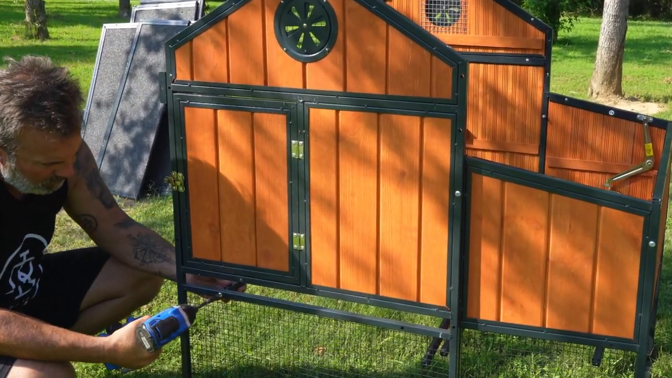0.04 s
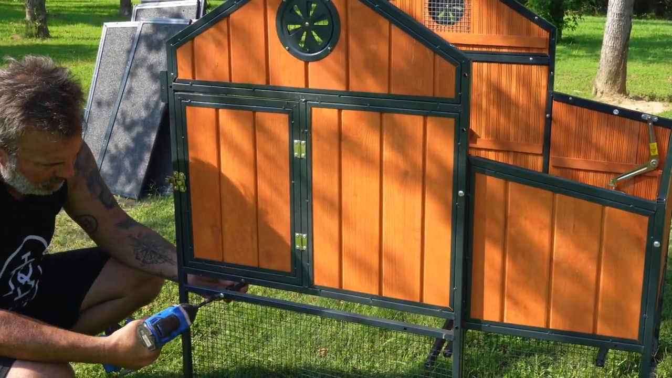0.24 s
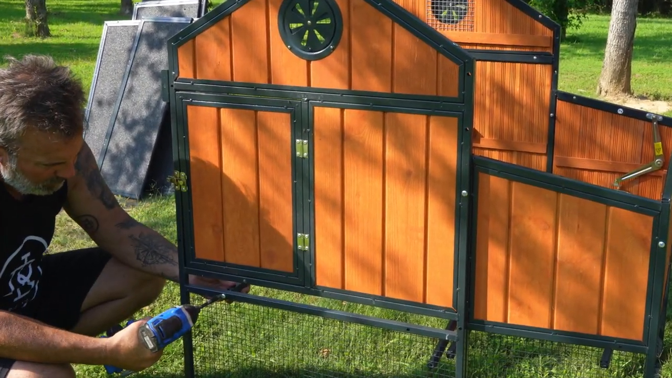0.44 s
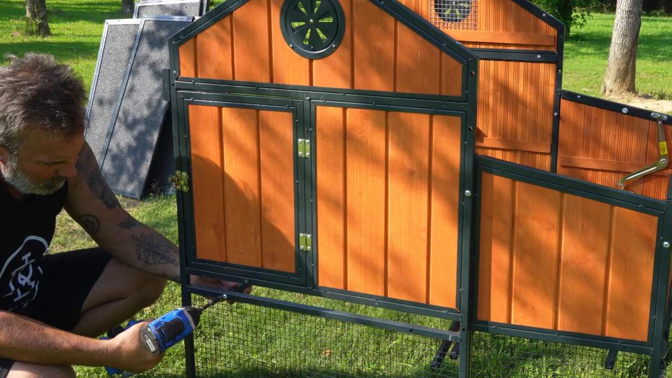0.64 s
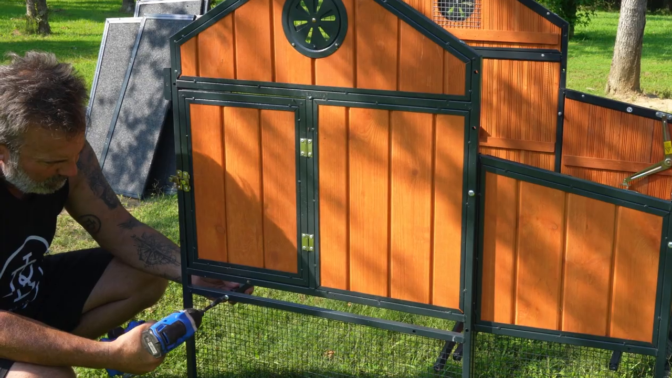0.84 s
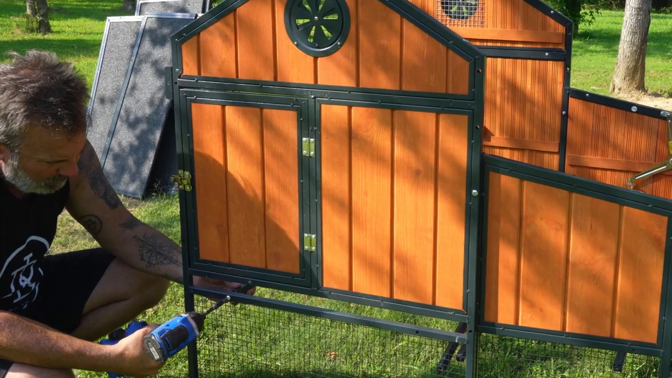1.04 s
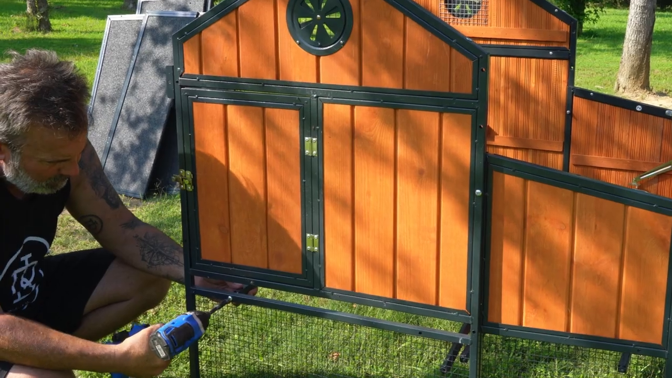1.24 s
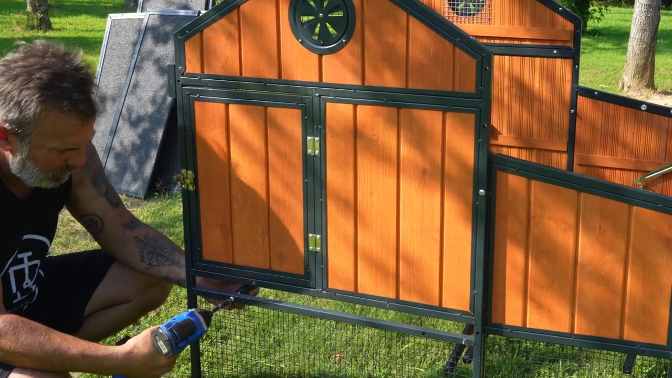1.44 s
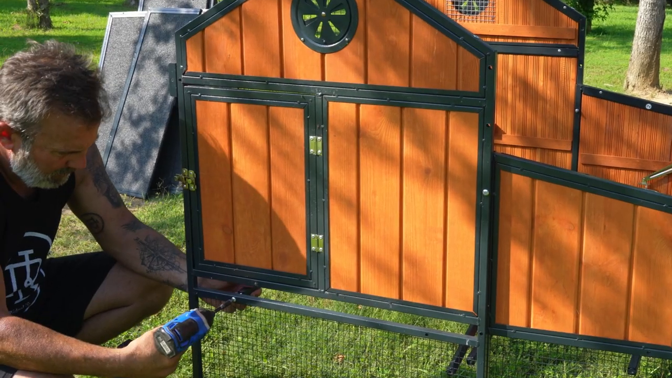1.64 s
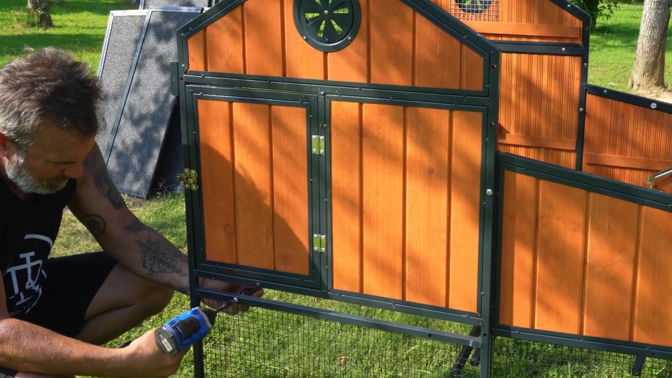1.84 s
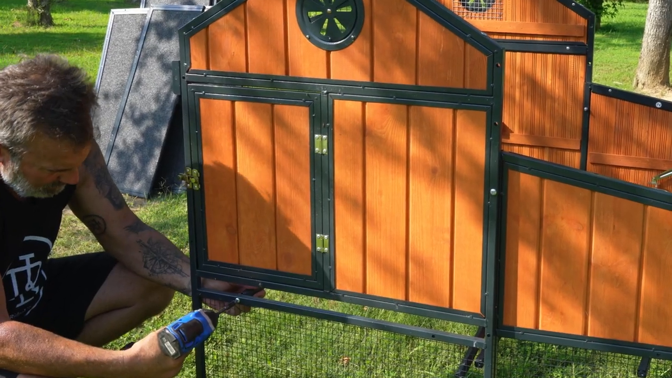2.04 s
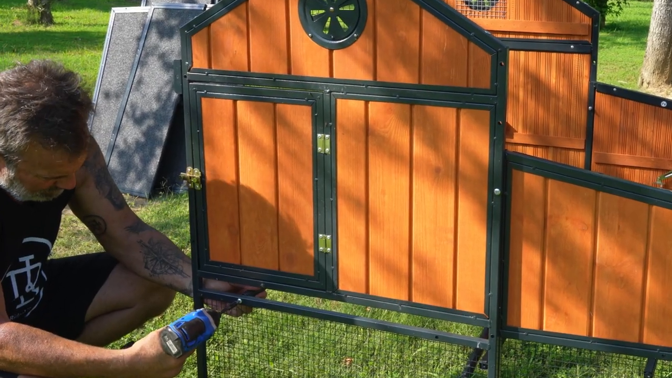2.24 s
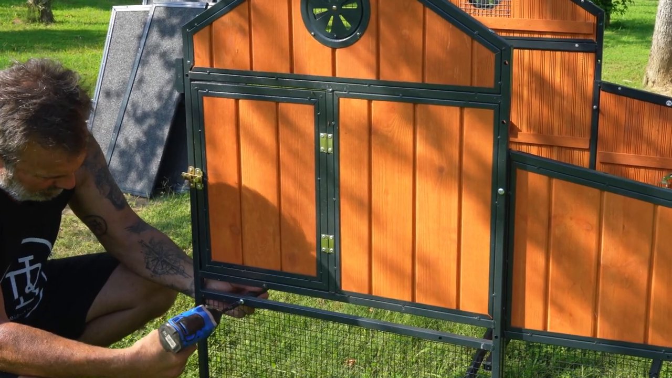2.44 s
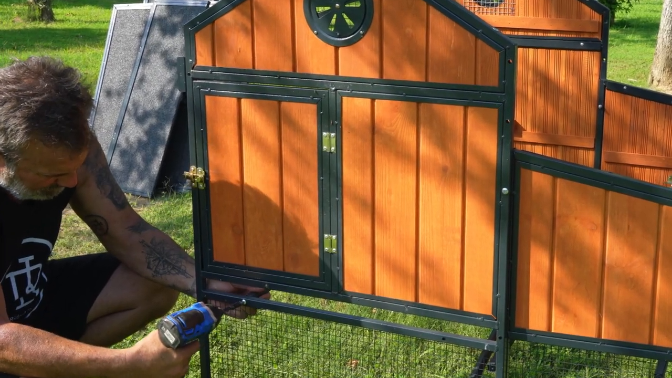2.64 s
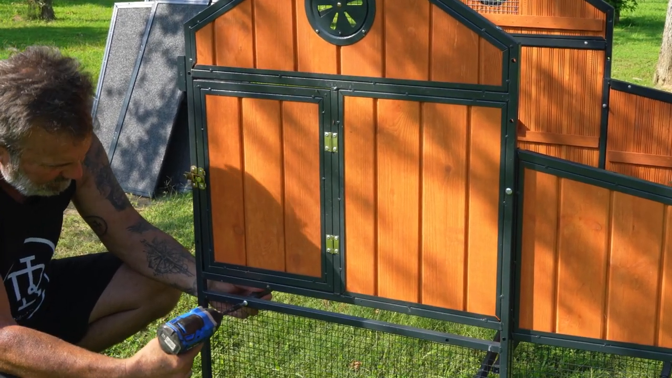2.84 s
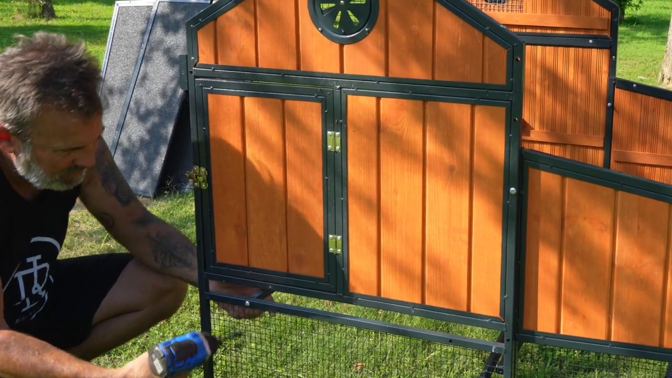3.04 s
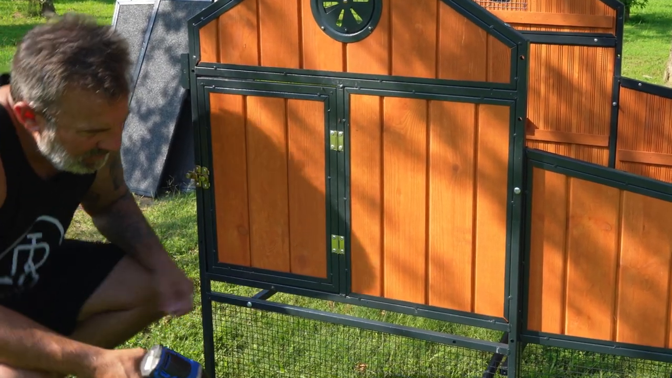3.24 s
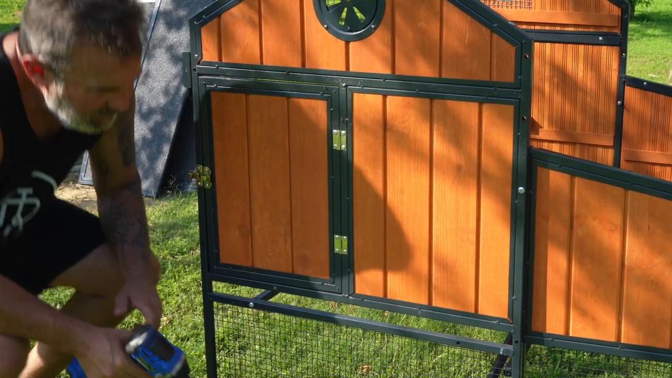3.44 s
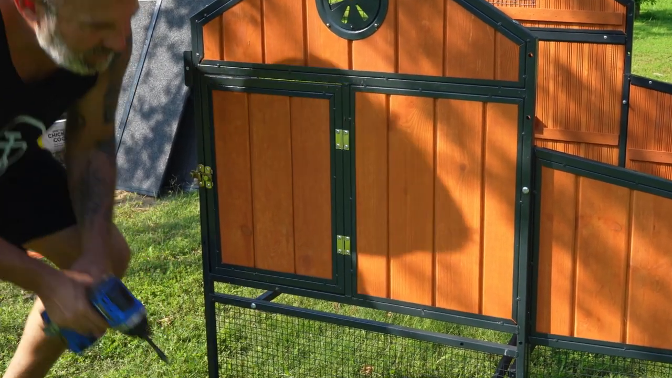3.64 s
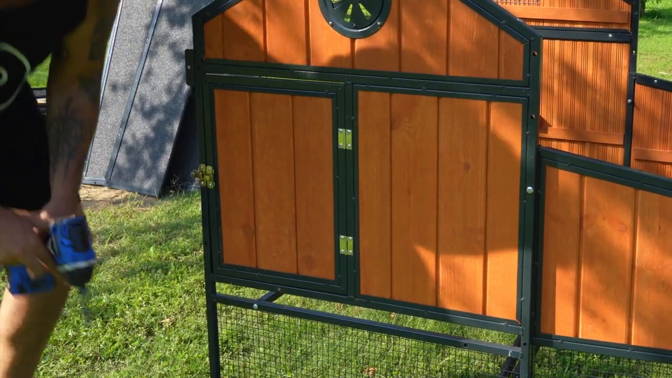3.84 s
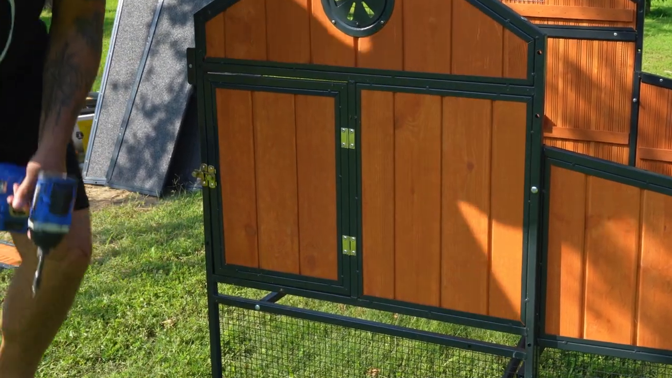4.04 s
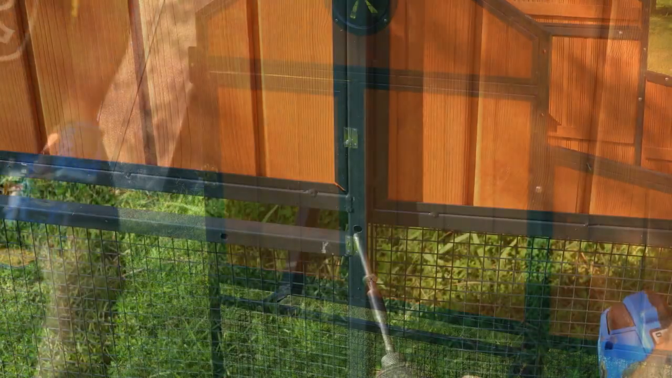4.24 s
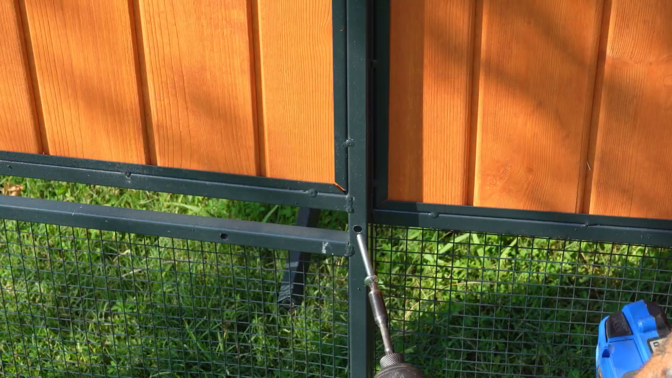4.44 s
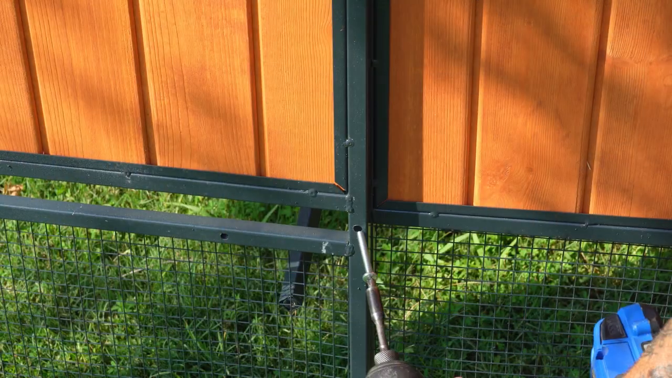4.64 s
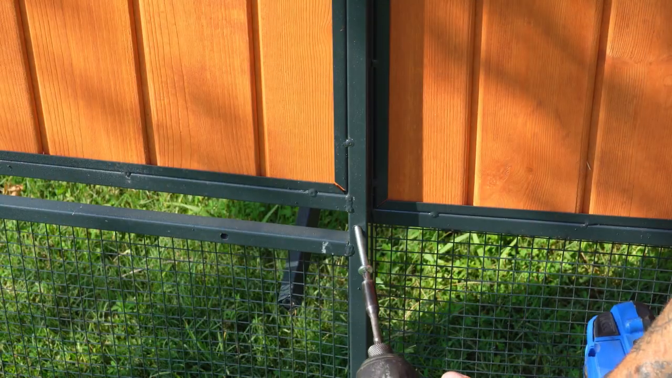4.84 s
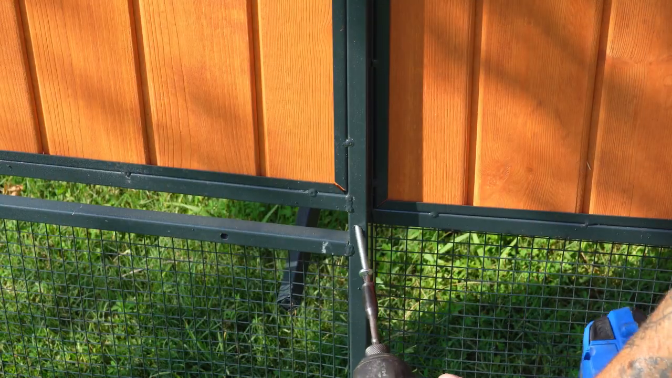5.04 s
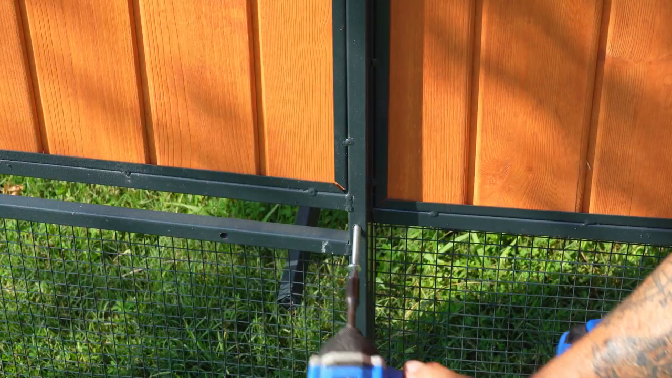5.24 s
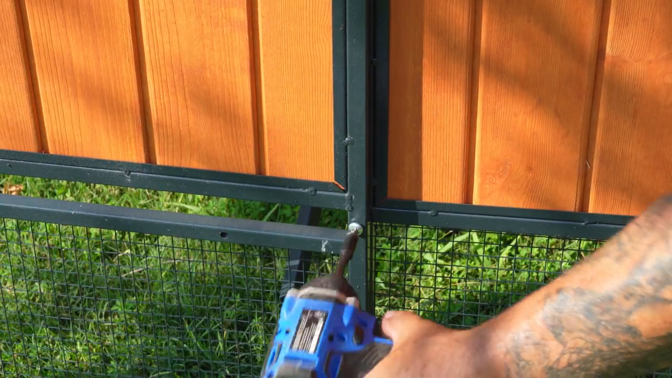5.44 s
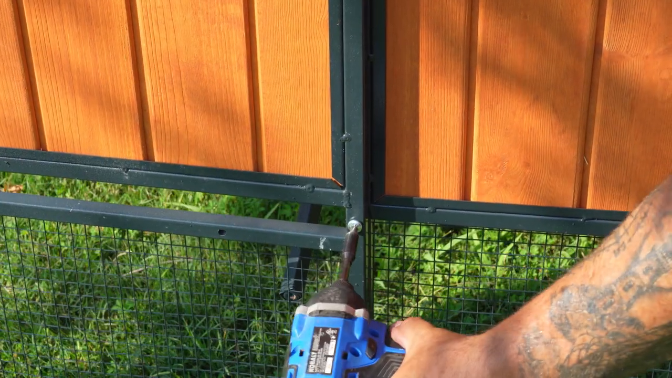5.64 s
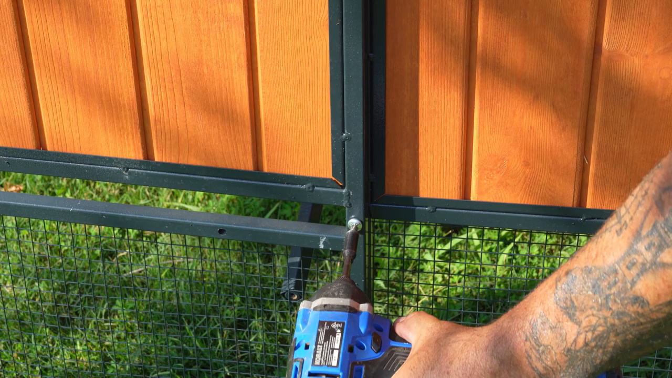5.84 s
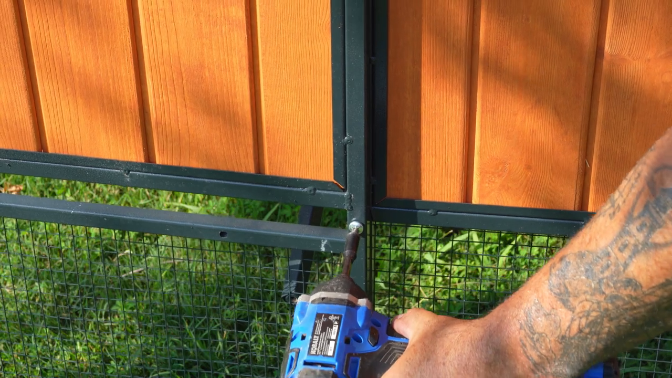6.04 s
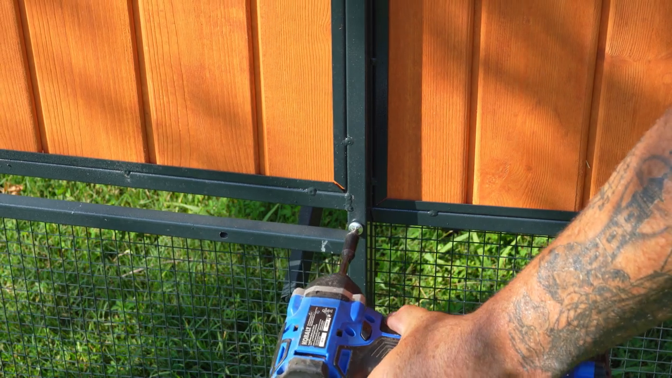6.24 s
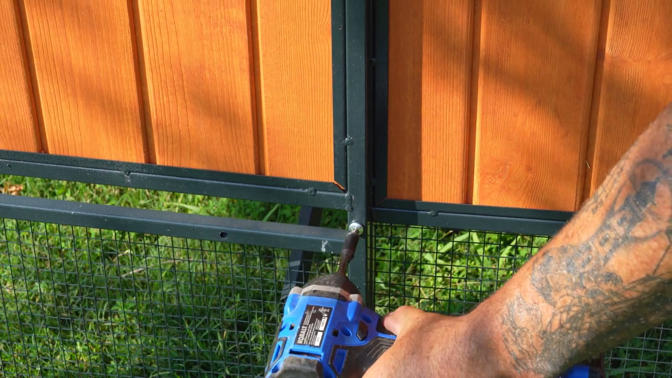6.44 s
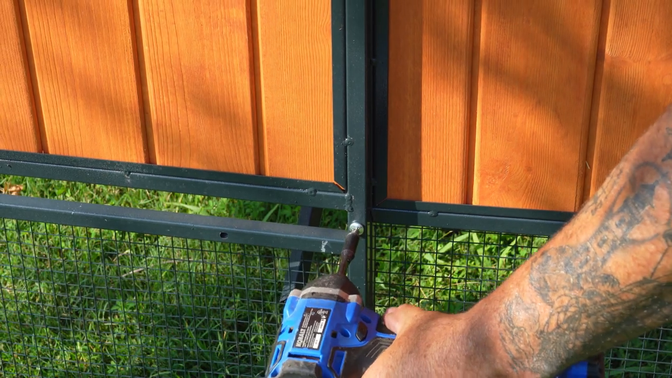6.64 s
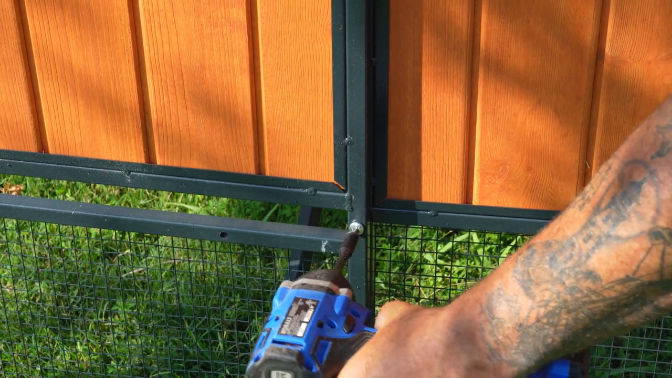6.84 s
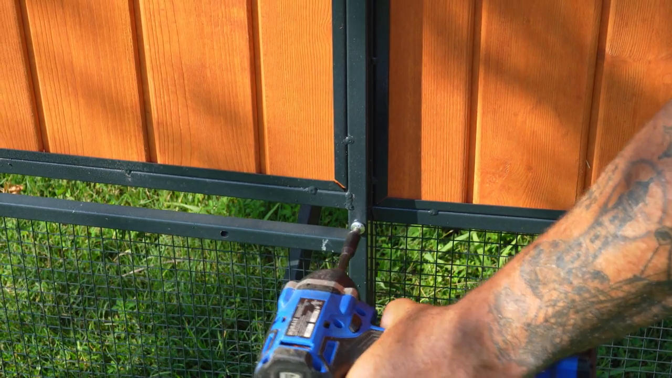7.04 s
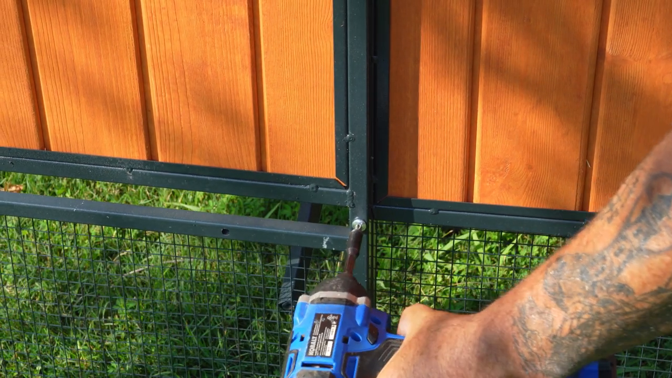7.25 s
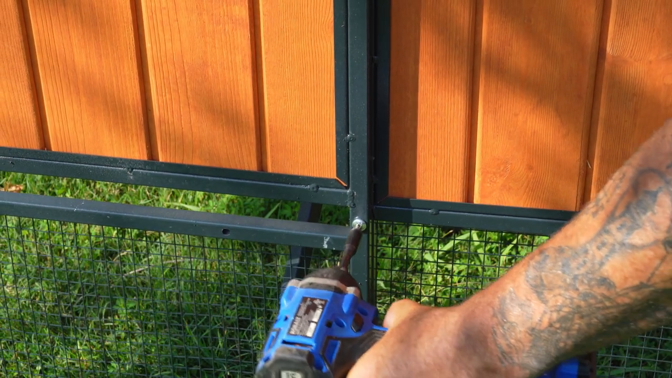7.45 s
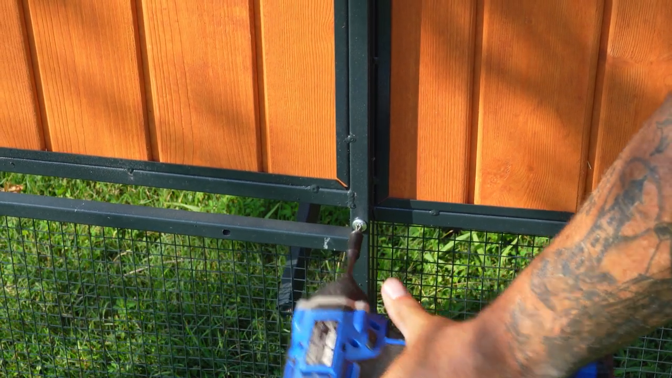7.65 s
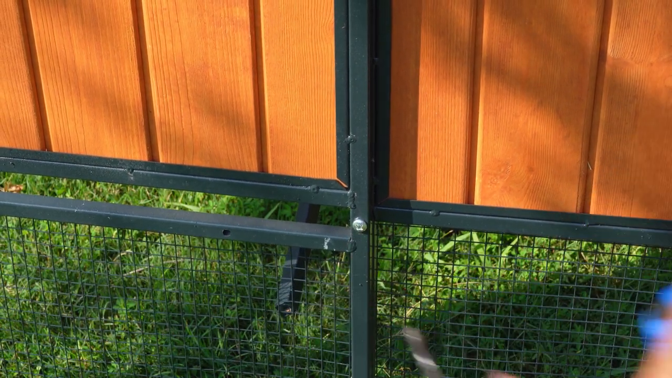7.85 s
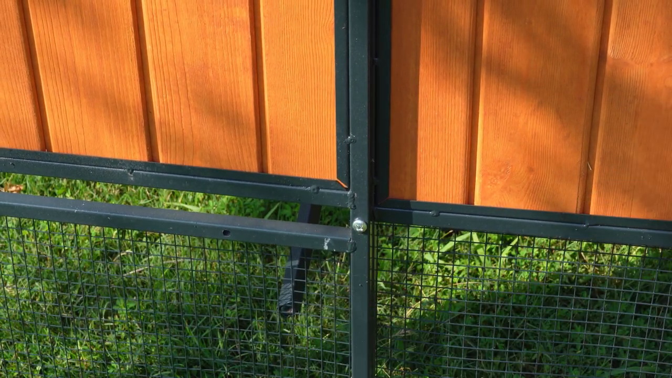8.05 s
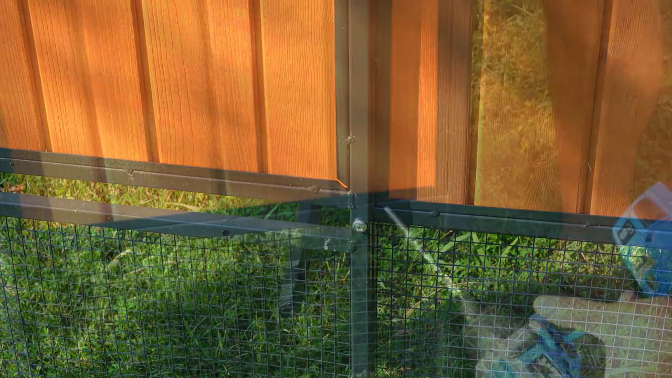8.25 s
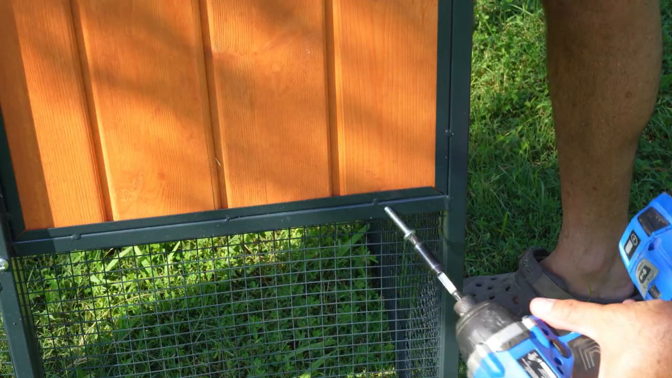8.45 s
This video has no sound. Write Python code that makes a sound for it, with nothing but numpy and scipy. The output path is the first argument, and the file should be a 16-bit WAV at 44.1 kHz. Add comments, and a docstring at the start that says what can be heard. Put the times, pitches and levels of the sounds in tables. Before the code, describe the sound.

A cordless impact driver whines and hammers bolts into a steel frame in short bursts, with clicks and knocks between and faint birds outdoors.

```python
"""A cordless impact driver spins two bolts into the steel frame of a wooden hutch on a lawn.
Over outdoor air and far birds, the bit ticks and knocks on frame and panels. From 1.8 s the motor
whines through its housing in three pulls; in the third the bolt is tight, the hammer strikes the
anvil and the bit rattles free. From 4.8 s the bit knocks and scrapes into the second bolt, which
one pull at 6.9 s spins in and hammers tight. A last rattle and a few ticks follow."""
import sys
import numpy as np
from scipy import signal
from scipy.fft import rfft, irfft, next_fast_len
from scipy.io import wavfile
from scipy.ndimage import uniform_filter1d

SR = 44100
rng = np.random.default_rng(int(sys.argv[2]) if len(sys.argv) > 2 else 0)


def transcribe(u):
    """Save the signal u as a 16-bit wav file named by the first command-line argument.

    u: samples, shape (n,) or (channels, n), limited to [-1, 1]; the rate is SR.
    q: integer samples, one column per channel.
    """
    v = np.clip(np.atleast_2d(u).T, -1, 1)
    q = np.round(v * 32767).astype(np.int16)
    wavfile.write(sys.argv[1], SR, q)


N = 375291
TIME_S = np.arange(N) / SR
PLACE = np.clip((TIME_S - 4.3) / .34 + .5, 0, 1)  # 0 at bolt 1, 1 at bolt 2
REFERENCE_HZ = 800
# motor speed, one list per trigger pull: (time [s], first whine order [Hz])
MOTOR_SPEED = [
    [(1.79, 30), (1.85, 470), (1.89, 750), (1.914, 825), (1.966, 718), (1.994, 640), (2.05, 510),
     (2.075, 400)],
    [(2.09, 20), (2.15, 440), (2.196, 750), (2.22, 845), (2.27, 730), (2.324, 600), (2.37, 520)],
    [(2.415, 20), (2.5, 430), (2.54, 600), (2.62, 1150), (2.72, 1200), (2.85, 600)],
    [(6.89, 30), (6.95, 400), (6.98, 645), (7.02, 865), (7.06, 1115), (7.09, 1255), (7.122, 1300),
     (7.145, 1245), (7.18, 1125), (7.3, 1270), (7.6, 1280), (7.68, 750), (7.77, 500)],
]


def undb(db):
    return np.exp(np.asarray(db) * (np.log(10) / 20))


def unit(x):
    return x / np.sqrt(np.mean(x ** 2))


def bolt(first, second):
    """Crossfade from bolt 1 to bolt 2."""
    return first + (second - first) * PLACE


def bolt_gain(first_db, second_db):
    return bolt(undb(first_db), undb(second_db))


def butter(x, hz, kind="low"):
    return signal.sosfilt(signal.butter(2, hz, kind, fs=SR, output="sos"), x)


def colour(x, points):
    """Shape by (frequency [Hz], gain [dB]) points; white noise keeps its level."""
    n = next_fast_len(N)
    hz, db = np.transpose(points)
    bins_hz = np.arange(n // 2 + 1) * SR / n
    gain = undb(np.interp(np.log(bins_hz + 1), np.log(hz), db))
    return irfft(rfft(x, n) * unit(gain), n)[:N]


def ring(x, modes):
    """Resonances (frequency [Hz], width [Hz], gain [dB]); a list x drives each on its own."""
    drives = x if isinstance(x, list) else [x] * len(modes)
    out = sum(undb(db) * signal.lfilter(*signal.iirpeak(hz, hz / width, SR), drive) / np.sqrt(width)
              for drive, (hz, width, db) in zip(drives, modes))
    return out / np.sqrt(np.pi / SR * sum(undb(2 * db) for _, _, db in modes))


def walk(rate_hz):
    """Slewed random steps, RMS 1."""
    hold = int(SR / rate_hz)
    steps = np.repeat(rng.standard_normal(N // hold + 1), hold)
    return unit(uniform_filter1d(steps, hold)[:N])


def jolts(times_s, dbs):
    """One sample of force per contact."""
    force = np.zeros(N)
    force[(np.asarray(times_s) * SR).astype(int)] = undb(dbs)
    return force


def bursts(times_s, dbs, t60s, rise_s=0.00058):
    """Noise with a sharp rise and an exponential fall per contact."""
    power = np.zeros(N)
    for s, db, t60 in np.broadcast(times_s, dbs, np.maximum(t60s, .003)):
        i = int(s * SR)
        t = TIME_S[:min(int(t60 * SR), N - i)]
        power[i:i + len(t)] += undb(2 * (db - 60 * t / t60)) * (1 - np.exp(-t / rise_s))
    return np.sqrt(power) * rng.standard_normal(N)


def swells(rows, rise_db=30):
    """Envelope that climbs to each peak and dies away; powers add."""
    t = TIME_S[::16]
    power = sum(undb(2 * (db - np.where(t < s, rise_db * (s - t) / rise_s, 60 * (t - s) / t60)))
                for s, db, rise_s, t60 in rows)
    return np.interp(TIME_S, t, np.sqrt(power))


def echoes(x, t60_s):
    """Diffuse return: decaying noise as the response."""
    t = np.arange(int(t60_s * SR)) / SR
    tail = undb(-60 * t / t60_s) * rng.standard_normal(len(t))
    return signal.fftconvolve(x, tail / np.sqrt(np.sum(tail ** 2)))[:N]


def air():
    """Leaves and far traffic, swelling slowly."""
    # one spectrum per bolt: (frequency [Hz], density [dB])
    spectra = [
        [(15, -43.5), (35, -6.5), (236, -6), (277, -15), (326, 4), (354, -12.5), (489, -7), (607, -11),
         (1560, -20), (2350, -23), (3620, -26.5), (16000, -54.5)],
        [(15, -41), (35, -11.5), (166, -4.5), (301, -17.5), (335, -3.5), (405, -19.5), (531, -13.5),
         (1020, -13.5), (1840, -25.5), (3820, -31.5), (4140, -34.5), (16000, -58)],
    ]
    # air level: (bolt 1 [dB], bolt 2 [dB])
    levels_db = [-64, -63]
    first, second = (undb(db) * unit(colour(rng.standard_normal(N), spectrum))
                     for spectrum, db in zip(spectra, levels_db))
    return undb(walk(2.1)) * (np.sqrt(1 - PLACE) * first + np.sqrt(PLACE) * second)


def hutch(blows, motor_level, load, spot_db_per_octave=21.5, soft_hz=852):
    """Shoves, knocks, motor rumble and hammer blows drive the panel modes."""
    # shoves on the hutch: (peak time [s], level [dB], rise [s], T60 [s])
    shoves = [(0.005, -49.5, 0.013, 0.17), (1.024, -44.5, 0.063, 0.17), (1.166, -48.5, 0.042, 0.19),
              (1.238, -41, 0.051, 0.28), (1.472, -46, 0.016, 0.76), (2.56, -13.5, 0.023, 0.12),
              (2.75, -18, 0.19, 0.39), (2.89, -43, 0.03, 1.16), (3.3, -57, 0.041, 2.4),
              (4.77, -47.5, 0.014, 1), (4.938, -33, 0.034, 0.25), (5.05, -56, 0.023, 2.2),
              (5.328, -31, 0.004, 0.38), (5.39, -17, 0.044, 0.34), (5.505, -19, 0.1, 0.41),
              (5.67, -50, .02, 1.95), (6.118, -54.5, 0.028, 1.7), (6.49, -13.5, 0.018, 0.067),
              (6.51, -29, .01, 0.57), (7.06, -24, 0.084, 0.7), (7.63, -14.5, 0.015, 0.38),
              (7.82, -44, 0.024, 2.16), (8.29, -53, 0.061, 0.14), (8.37, -39.5, 0.0069, 0.075)]
    # knocks on the panels: (time [s], level [dB], T60 [s], pitch of the struck spot [Hz])
    knocks = [(0.346, -45.5, 0.36, 315), (0.613, -36.5, 0.18, 480), (1.018, -53, 0.089, 433),
              (1.233, -50, 0.073, 330), (1.474, -20, 0.065, 280), (1.567, -49, 0.033, 230),
              (2.547, -11, 0.15, 290), (3.025, -31, 0.14, 325), (3.04, -34.5, 0.044, 640),
              (3.302, -33.5, 0.11, 610), (4.769, -28, 0.069, 250), (4.812, -35, .05, 250),
              (4.903, -20.5, 0.33, 343), (4.93, -19, 0.039, 345), (4.947, -25, .05, 240),
              (4.968, -36, .05, 330), (4.987, -24.5, 0.063, 330), (5.087, -35, 0.12, 347),
              (5.203, -35.5, 0.051, 240), (5.326, -23, 0.12, 310), (5.37, -7.5, 0.062, 330),
              (5.389, -1, 0.059, 385), (5.407, 3.5, 0.021, 730), (5.468, 5.5, 0.05, 805),
              (5.497, -8, 0.097, 265), (5.515, -0.5, 0.032, 227), (5.565, -14, 0.07, 260),
              (5.75, -31.5, 0.12, 250), (5.785, -35.5, 0.056, 250), (5.835, -40, .05, 255),
              (5.869, -35.5, .05, 255), (5.9, -35.5, 0.15, 373), (6.112, -35, 0.044, 338),
              (6.366, -35.5, 0.28, 382), (6.483, -16, 0.042, 340), (6.525, -13, 0.04, 230),
              (6.562, -25, 0.056, 255), (7.159, -4, 0.25, 295), (7.612, -8, 0.069, 804),
              (7.629, -9, 0.044, 500), (7.671, -9.5, 0.029, 414), (7.948, -27, 0.054, 620),
              (8.023, -31, 0.1, 370), (8.368, -29, 0.026, 483)]
    # panel modes: (frequency [Hz], width [Hz], gain at bolt 1 [dB], gain at bolt 2 [dB])
    panels = [(47.9, 69, -11, -1), (176, 62, -5.5, 2.5), (225, 28, -4, -2), (255.4, 15, -0.5, -0.5),
              (300.6, 30, 3.5, 2), (347, 13, 0.5, 1), (376.7, 20, 0, -3), (419.6, 27, 3, -6),
              (482.4, 35, -1.5, 1), (637.3, 84, 1.5, -4.5), (707, 110, -4, -6.5), (808, 33, -6.5, -4),
              (918, 96, -8, -9.5), (1180, 110, -13.5, -18.5)]
    s, db, t60_s, spot_hz = np.transpose(knocks)
    push = np.hypot(swells(shoves), bolt_gain(1, 0) * motor_level)
    push = push * undb(walk(40)) * rng.standard_normal(N)
    push *= undb(-8 * load * PLACE)  # bolt 2 clamps the frame: less rattle under the hammer
    thuds = bursts(s, db, t60_s, rise_s=0.0034)
    common = undb(-8.5) * push + undb(-21) * thuds + undb(0.5) * blows
    drives = []
    for hz, width, db1, db2 in panels:
        off_spot_db = spot_db_per_octave * abs(np.log2(hz / spot_hz))
        hits = jolts(s, db + 11 - off_spot_db) * np.sqrt(30 / width)
        drives.append((common + hits) * bolt_gain(db1, db2))
    wood = undb(5) * ring(drives, [(hz, width, 0) for hz, width, _, _ in panels])
    return butter(wood, soft_hz)  # soft contacts carry little treble


def birds():
    """Far whistles that glide and settle, smeared by echoes among the trees."""
    # calls: (start [s], length [s], first pitch [Hz], last pitch [Hz], level [dB])
    calls = [(0.033, 0.12, 1490, 1790, -85), (0.115, .04, 2110, 2380, -75), (0.18, 0.085, 4800, 3480, -74),
             (0.452, 0.11, 1500, 1780, -78), (0.532, 0.028, 2070, 2370, -68),
             (0.575, 0.1, 5250, 3460, -71.5), (0.863, 0.1, 1480, 1720, -77),
             (0.948, 0.036, 2050, 2400, -68), (1.027, 0.065, 4100, 3530, -70),
             (1.257, .05, 3700, 3820, -73), (1.35, 0.043, 2080, 2430, -70), (1.422, 0.074, 4700, 3900, -76),
             (4.576, .12, 3150, 3870, -78.5)]
    out = np.zeros(N)
    for s, length_s, first_hz, last_hz, db in calls:
        u = np.linspace(0, 1, int(length_s * SR))
        hz = last_hz + (first_hz - last_hz) * (1 - u) ** (2.5 if first_hz > last_hz else 1.2)
        i = int(s * SR)
        out[i:i + len(u)] += undb(db) * np.sin(np.pi * u) * np.sin(2 * np.pi * np.cumsum(hz) / SR)
    return out + undb(3) * echoes(out, t60_s=0.6)


def ticks(clink_t60_s=.12, rasp_t60_s=.075, treble_t60_s=.08, spread_octaves=.35):
    """Bit and trigger touch steel: a two-band rasp and the bit's ring, its modes varying by touch."""
    # touches: (time [s], level [dB], relative treble [dB])
    touches = [(0.0915, -45, -31), (0.3404, -36, -10), (.995, -40, -8), (1.001, -35.5, -7.5),
               (1.012, -35.5, -18), (1.1348, -45.5, -14), (1.1542, -35, -11), (1.207, -42.5, -9),
               (1.2615, -48, -23), (1.298, -51.5, -12), (1.4227, -49.5, -27), (1.47, -37.5, -25),
               (1.701, -51, -25), (1.735, -45, -11), (1.756, -40, -24), (1.7853, -27, -20),
               (1.807, -24.5, -9.5), (1.8574, -25.5, -27), (2.003, -38, -25), (2.073, -34, -15),
               (2.089, -39, -12), (2.3562, -30, -9.5), (2.387, -39, -24), (2.398, -43, -22.5),
               (2.422, -33.5, -22.5), (3.038, -44.5, -14), (3.11, -46, -31), (3.1644, -45.5, -8),
               (3.2632, -62, -36), (3.37, -53, -23), (3.427, -43.5, -6), (3.567, -55, -24),
               (3.683, -45.5, -5), (3.797, -58, -8.5), (3.847, -51, -21.5), (3.87, -50, -17),
               (3.8988, -53, -13), (3.939, -58.5, -14), (4.0992, -54, -3), (4.1983, -64.5, -2),
               (4.785, -53, -24), (4.8748, -46, -28.5), (4.899, -36, -33.5), (4.913, -31, -28),
               (4.9336, -42, -28.5), (4.959, -39, -26), (5.0867, -47, -30), (5.1683, -43.5, -11.5),
               (5.337, -26, -14), (5.361, -14, -5.5), (5.405, -11.5, -30), (5.46, -16.5, 1.5),
               (5.474, -16, -3.5), (5.537, -19, -3), (5.572, -29, -5), (5.657, -37.5, -27),
               (5.686, -39.5, -14), (5.756, -44.5, -8), (6.021, -42, -29), (6.102, -42, -13.5),
               (6.181, -47, -30.5), (6.213, -49.5, -16), (6.365, -41, -11), (6.484, -39, -17),
               (6.526, -28.5, -32), (6.573, -33.5, -30), (6.637, -38.5, -21), (6.728, -45, -15.5),
               (6.785, -41.5, -7), (6.843, -44.5, -19), (6.867, -27.5, -22), (6.895, -20.5, -13),
               (6.922, -20, -25), (6.951, -18, -28.5), (8.13, -40.5, -31), (8.3335, -73.5, -24),
               (8.37, -44, -28.5), (8.473, -48.5, -9.5)]
    # bit ring, damped in the fingers, loose when carried: (time [s], relative level [dB])
    looseness = [(1.3, -38), (1.6, -24), (3, -24), (3.08, -19), (4.3, -19), (4.6, -28)]
    # bit modes: (frequency [Hz], width [Hz], gain [dB])
    bit_modes = [(2540, 45, -3), (2920, 40, -5), (3200, 50, -4), (3550, 50, -1), (3850, 55, -2),
                 (4300, 70, -7), (4620, 70, -7), (5350, 80, -9)]
    # rasp, lower band: (frequency [Hz], gain [dB])
    rasp_spectrum = [(700, -13), (1500, 2.5), (3000, 4.5), (5000, -2.5), (7000, -14), (10000, -26)]
    # rasp, upper band: (frequency [Hz], gain [dB])
    treble_spectrum = [(4000, -17.5), (6500, -1.5), (10000, -7.5), (15500, -17)]
    s, db, treble_db = np.transpose(touches)
    stretch = 2 ** (spread_octaves * rng.standard_normal(len(s)))
    drive = bursts(s, db + np.interp(s, *np.transpose(looseness)), clink_t60_s * stretch)
    clink = sum(undb(mode_db) * ring(undb(5.5 * walk(12)) * drive, [(hz, width, 0)])
                for hz, width, mode_db in bit_modes)
    rasp = colour(bursts(s, db, rasp_t60_s * stretch, rise_s=0.00071), rasp_spectrum)
    treble = colour(bursts(s, db + treble_db, treble_t60_s * stretch, rise_s=0.0012), treble_spectrum)
    return undb(-13) * rasp + clink + undb(-12) * treble


def trigger(load, db_per_octave=6, brake_t60_s=.029, chop_t60_s=.1, crawl_hz=100):
    """Motor level (up with speed and load, braked on release) and chop level (fades at full current)."""
    # pulls: (start [s], full current [s], release [s], motor level [dB], chop level [dB])
    pulls = [(1.786, 1.915, 2.064, -36, -64), (2.086, 2.225, 2.352, -37, -61.5),
             (2.424, 2.545, 2.852, -33.5, -58), (6.895, 7.07, 7.19, -30.5, -62)]
    motor_level, chop_level = np.zeros((2, N))
    for (start_s, full_s, release_s, db, chop_db), speed in zip(pulls, MOTOR_SPEED):
        on = TIME_S > start_s
        speed_hz = np.maximum(np.interp(TIME_S, *np.transpose(speed)), crawl_hz)
        speed_db = db_per_octave * np.log2(speed_hz / REFERENCE_HZ)
        brake_db = 60 * np.maximum(TIME_S - release_s, 0) / brake_t60_s
        motor_level += on * undb(db + speed_db - brake_db)
        chop_level += on * undb(chop_db - 60 * np.maximum(TIME_S - full_s, 0) / chop_t60_s)
    motor_level *= undb(bolt(0.5, 5.5) * load)
    return uniform_filter1d(motor_level, size=201), uniform_filter1d(chop_level, size=201)


def motor_speed_hz():
    """Smoothed speed curve; 400 Hz outside the pulls."""
    hz = np.full(N, 400.)
    for rows in map(np.array, MOTOR_SPEED):
        on = (TIME_S >= rows[0, 0]) & (TIME_S <= rows[-1, 0])
        hz[on] = np.interp(TIME_S[on], *rows.T)
    return uniform_filter1d(hz, size=201)


def motor(level, chop_level, load, chop_hz=15720, treble_hz=5100, treble_db_per_octave=1.5):
    """Whine and shaft-pulsed gear noise ring the housing; chopped current makes the windings sing."""
    # whine of windings and gears: (order, level at bolt 1 [dB], level at bolt 2 [dB])
    orders = [(1.6, -40, -16), (2, -14, -11), (3.27, -26, -10), (4, -10, -9), (4.55, -40, -14),
              (5, -14, -20), (6, -14, -24), (7, -14, -28), (8, -16, -30)]
    # housing modes: (frequency [Hz], width [Hz], gain [dB])
    housing = [(2850, 260, 0), (3750, 220, -1), (4700, 240, -5), (8700, 1200, -6), (900, 300, -11),
               (2400, 300, -13), (3300, 300, -7), (4250, 220, -6), (6300, 700, -10), (7500, 500, -13)]
    # vent resonances, one list per bolt: (frequency [Hz], width [Hz], gain [dB])
    vent_modes = [
        [(3000, 900, 0)],
        [(2050, 200, -9), (2550, 400, -3), (3050, 600, 0), (4240, 200, -3), (5200, 200, -14)],
    ]
    # gear and fan noise: (frequency [Hz], gain [dB])
    gear_spectrum = [(650, -40), (1100, 1), (1610, 0.5), (1760, 1), (3330, -0.5), (6310, -9), (6750, -15.5),
                     (8260, -22.5), (13100, -34.5), (16000, -36.5)]
    speed_hz = motor_speed_hz()
    wobble = (.0025 + .04 * load) * walk(120)  # blows jolt the shaft and smear the whine
    turns = np.cumsum(speed_hz * (1 + wobble)) / SR
    whine = sum(bolt_gain(db1, db2) * undb(2.3 * walk(45)) * np.sin(2 * np.pi * order * turns)
                for order, db1, db2 in orders)
    whine *= undb(-13 * load)
    mesh = undb(2 * np.sin(np.pi * turns) + 2.1 * walk(120)) * rng.standard_normal(N)
    chop = sum(undb(db) * np.sin(2 * np.pi * (chop_hz * TIME_S - order * turns))
               for order, db in [(.5, -12.5), (1, -4.5), (2, -10)])
    vents = bolt(undb(-9) * ring(whine, vent_modes[0]), undb(-7) * ring(whine, vent_modes[1]))
    # the whine crosses stator and shell, so it is filtered twice
    stator = bolt_gain(-13, -24) * ring(whine, housing)
    shell = ring(bolt_gain(-7, -8) * mesh + stator, housing)
    body = undb(-6) * colour(mesh, gear_spectrum) + shell + vents
    dull = butter(body, treble_hz)
    # treble needs speed or hammer load
    bright = np.minimum(undb(-2 + treble_db_per_octave * np.log2(speed_hz / REFERENCE_HZ)), 1)
    return level * (dull + np.maximum(load, bright) * (body - dull)) + chop_level * chop


def chatter(t60_s=0.02):
    """Dry clacks of the bit, most where it slips in the bolt head."""
    # clacks: (time [s], level [dB])
    clacks = [(2.075, -32), (2.0899, -34), (2.5474, -8.5), (2.5724, -9), (2.7276, -9.5), (2.7416, -15),
              (2.748, -12), (2.762, -9), (2.775, -14), (2.795, -8), (2.808, -10), (2.819, -7.5),
              (2.831, -10), (2.8408, -14.5), (3.3517, -48.5), (3.752, -53.5), (4.034, -57.5),
              (7.1862, -10.5), (7.6079, -10.5), (7.614, -15), (7.629, -12.5), (7.635, -10), (7.6429, -8),
              (7.6488, -11.5), (7.666, -18.5), (7.693, -13), (7.7038, -7), (7.7173, -8.5), (7.7285, -10),
              (7.7373, -13), (7.7473, -10.5), (7.756, -12), (7.765, -21.5)]
    # clack spectrum: (frequency [Hz], gain [dB])
    spectrum = [(290, -46.5), (500, -14.5), (621, -8), (1250, -11), (1600, -4.5), (3150, -7.5), (4280, -7),
                (6800, -17), (14500, -26.5), (16000, -30.5)]
    return undb(-3) * colour(bursts(*np.transpose(clacks), t60_s), spectrum)


def blow_pattern(pace_blows=3.5):
    """Times [s] and levels [dB] of the hammer blows: slow at first, then steady."""
    # one run per bolt: (first blow [s], stop [s], settled period [s], run-up lag [s], level [dB])
    runs = [(2.5535, 2.742, .0207, .014, -8.3), (7.1975, 7.622, .02, .018, -8.1)]
    k = np.arange(30)
    times_s, dbs = [], []
    for first_s, stop_s, period_s, lag_s, db in runs:
        s = first_s + period_s * k + lag_s * (1 - np.exp(-k / pace_blows))
        times_s.extend(s[s < stop_s])
        dbs.extend([db] * np.sum(s < stop_s))
    return np.array(times_s), np.array(dbs)


def hammer_load(times_s, dbs):
    """1 from 14 ms before a blow to 122 ms after it, else 0."""
    struck = 1. * (jolts(times_s, dbs) > 0)
    return np.minimum(uniform_filter1d(struck, size=6001, origin=2400) * 6001, 1)


def uneven(times_s, dbs, jitter_s=.0004, scatter_db=.8):
    """No two blows land quite alike."""
    late, hard = rng.standard_normal((len(times_s), 2)).T
    return times_s + jitter_s * late, dbs + scatter_db * hard


def hammer(s, db, crack_t60_s=.022, rattle_t60_s=.16, mode_scatter_db=3.5):
    """Each blow cracks, rings the anvil in a new mix of modes and leaves the bolt rattling."""
    # anvil modes: (frequency [Hz], width [Hz], gain at bolt 1 [dB], gain at bolt 2 [dB])
    anvil_modes = [(1600, 90, -7, -13), (2530, 57, -0.5, -1.5), (2660, 80, 0, 0), (2940, 70, -6, -17),
                   (3340, 70, -10.5, 0), (3380, 90, -1.5, -1), (3570, 90, -9, -2.5), (3630, 60, -4, -6),
                   (3940, 80, -9, -2), (4040, 60, 1.5, -4), (4300, 70, -8, -1), (4530, 97, -3.5, -4.5),
                   (4910, 130, 1.5, -13), (5800, 200, 4.5, -4), (7185, 300, -4, -24),
                   (8630, 100, -8.5, 1.5), (12800, 500, -13, -3), (14500, 420, -16, 5.5)]
    # blow noise: (frequency [Hz], gain [dB])
    spectrum = [(410, -32.5), (700, 0.5), (1110, -9.5), (1310, -2), (3370, -4.5), (6740, -9), (8650, -6),
                (9600, -11.5), (14600, -11), (16000, -19)]
    crack = undb(-1) * bursts(s, db, crack_t60_s, rise_s=0.0006)
    rattle = undb(2.3 * walk(250)) * bursts(s + 0.003, db - 8.5, rattle_t60_s)
    noise = crack + butter(rattle, hz=6000)
    scatter_db = mode_scatter_db * rng.standard_normal((len(s), len(anvil_modes)))
    drives = [bolt_gain(db1, db2) * (undb(-12.5) * noise + jolts(s + .001, db + 4.5 + offset_db))
              for offset_db, (_, _, db1, db2) in zip(scatter_db.T, anvil_modes)]
    anvil = ring(drives, [(hz, width, 0) for hz, width, _, _ in anvil_modes])
    return undb(-6) * colour(noise, spectrum) + undb(2) * anvil


def scrape():
    """The bit scrapes round into the bolt head: steel on steel, in uneven grains."""
    # strokes: (peak time [s], level [dB], rise [s], T60 [s])
    strokes = [(3.05, -67, 0.2, 3.3), (4.93, -60, 0.058, 0.45), (5.345, -45.5, 0.018, 0.23),
               (5.412, -29.5, 0.069, 0.064), (5.472, -23.5, 0.062, 0.18), (5.5, -33.5, .01, 0.35),
               (6.1, -73.5, 0.88, 0.8), (6.486, -38, 0.02, 0.14), (6.54, -48, 0.022, 0.13),
               (6.642, -65.5, 0.023, 0.2), (7.675, -25.5, 0.12, 0.13), (7.82, -67.5, 0.0207, 5.7),
               (8.034, -59.5, 0.038, 0.079), (8.194, -58, 0.56, 0.5), (8.336, -49, 0.0068, 0.073),
               (8.376, -49.5, 0.016, 0.058)]
    # friction noise: (frequency [Hz], gain [dB])
    spectrum = [(710, -24), (1200, 0), (1490, 1.5), (1610, -0.5), (4260, -4.5), (4550, -7), (4860, -9),
                (16000, -32.5)]
    grains = undb(3.2 * walk(150)) * rng.standard_normal(N)
    return colour(swells(strokes) * grains, spectrum)


def loose_rail(shake):
    """A loose rail at bolt 1 rings on."""
    # (frequency [Hz], width [Hz], gain [dB])
    modes = [(308, 5.2, 7), (497, 4.4, -2.5), (630, 5, -7), (2584, 3, -3.5), (3670, 2.7, -9)]
    return (1 - PLACE) * ring(shake, modes)


def scene():
    """Driver and hutch with their echoes, over birds and air; mono."""
    pattern = blow_pattern()
    blows, load = uneven(*pattern), hammer_load(*pattern)
    motor_level, chop_level = trigger(load)
    driver = motor(motor_level, chop_level, load) + hammer(*blows) + chatter() + ticks()
    near = driver + hutch(jolts(*blows), motor_level, load) + scrape()
    near = butter(near, hz=130, kind="high")  # deep bass is thinned out below 130 Hz
    yard = undb(-14) * butter(echoes(near, t60_s=.091), hz=3000)
    walls = undb(-23.5) * echoes(near, t60_s=.55)  # bright return from hutch walls and ground
    return (near + yard + walls + undb(-34) * loose_rail(near) + birds() + air())[None]


def record(dry, drive=1.3, top_hz=15800):
    """Round the loudest peaks and cut the top."""
    rounded = np.tanh(drive * dry) / drive
    return signal.sosfilt(signal.ellip(12, .2, 80, top_hz, fs=SR, output="sos"), rounded)


dry = scene()
out = record(dry)
transcribe(out)
```